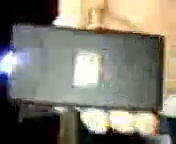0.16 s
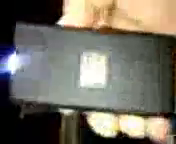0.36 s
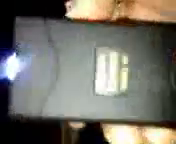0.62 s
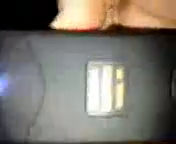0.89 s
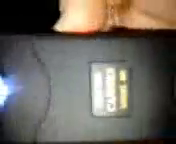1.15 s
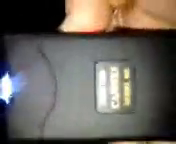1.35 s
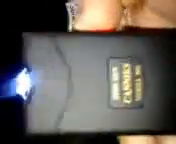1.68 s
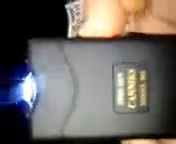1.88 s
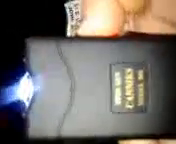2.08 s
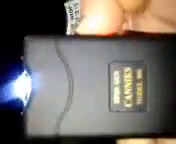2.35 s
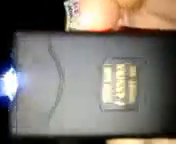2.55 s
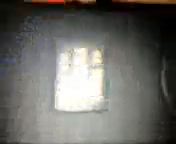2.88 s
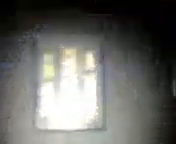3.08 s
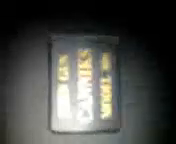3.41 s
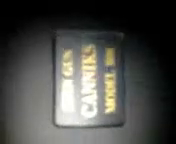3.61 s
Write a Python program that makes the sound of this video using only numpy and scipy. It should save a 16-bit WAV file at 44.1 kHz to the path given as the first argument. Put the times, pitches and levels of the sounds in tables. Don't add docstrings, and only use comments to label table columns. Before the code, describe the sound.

Brief faint room noise and a plastic click, then a stun gun's harsh electric rattle runs to the end, each snap with a low thump and short echo, close to a distorting, narrow-band microphone in a small indoor space.

```python
import sys
import numpy as np
from scipy import signal
from scipy.io import wavfile
from scipy.ndimage import uniform_filter1d

SR = 44100
rng = np.random.default_rng(int(sys.argv[2]) if len(sys.argv) > 2 else 0)


def bounce(signal):
    frames = np.transpose(np.atleast_2d(signal))
    limited = np.clip(frames, -1, 1)
    pcm = np.round(limited * 32767).astype(np.int16)
    wavfile.write(sys.argv[1], SR, pcm)


def ratio(d):
    e = np.asarray(d, float) / 20
    return 10 ** e


N = 164493

# start in seconds, strength in dB,
# thump in dB, echo fade in dB per 42 ms.
SPARK_ROWS = [(0.097, -17, -25, 2.5), (0.14, -4.5, -24.5, 8), (0.186, -13, -16, 6.5),
              (0.232, -2, -17, 10.5), (0.279, -5.5, -17, 7.5), (0.325, -5.5, -22.5, 2.5),
              (0.376, 2, -22, 4.5), (0.413, -6.5, -15, 14), (0.446, -6.5, -22.5, 6),
              (0.478, 0.5, -20, 7.5), (0.525, -3, -22.5, 8.5), (0.564, -7, -20.5, 1.5),
              (0.611, -3.5, -38, 2.5), (0.681, -19, -43, -12), (0.752, -11, -25, 2), (0.788, -7, -40, 4),
              (0.833, -0.5, -20.5, 6), (0.875, -5.5, -27, 8), (0.927, -5, -19, 11.5), (0.971, -6, -22, 7),
              (1.019, 1, -23, 13.5), (1.057, -18.5, -15.5, 0.5), (1.105, -4, -24, 7),
              (1.173, 3.5, -24.5, 6.5), (1.217, -5, -24, 5), (1.252, -1.5, -21, 10.5),
              (1.294, -5.5, -24.5, 2.5), (1.347, -1.5, -24.5, 5.4), (1.39, 6, -23.5, 17),
                 (1.429, -4.5, -23, 7.6), (1.479, -8.5, -46, 4.6), (1.515, -6.5, -21, 16),
                 (1.553, -8, -47, 5.1), (1.6, -6, -36, 6.9), (1.636, -3.5, -18, 10.5),
                 (1.673, 0, -20.5, 17.5), (1.709, -11, -39, 4.1), (1.757, -0.5, -37, 3.3),
                 (1.802, -4.5, -33, 3.2), (1.837, -0.5, -25, 6.9), (1.886, 1, -39, 6.5),
                 (1.926, -0.5, -39, 2), (1.973, -8, -31, 2.1), (2.014, 3, -34.5, 9.3),
                 (2.058, 2.5, -23.5, 3.5), (2.096, -0.5, -28, 3), (2.125, -14, -13, 16),
                 (2.168, -3.5, -17, 9.1), (2.206, -2.5, -36, 3.6), (2.252, -2.5, -20, 2),
                 (2.294, -2.5, -33, 5.9), (2.34, -3.5, -30, 1.7), (2.381, -2.5, -25, 6.7),
                 (2.417, -6, -18, 7.9), (2.464, -1.5, -25, 7.8), (2.509, 0, -48, 3.7),
              (2.554, 3, -33, 7.7), (2.593, -6.5, -36, 3.2), (2.63, -12, -22.5, 6.1),
               (2.68, -6.5, -34, 3.4), (2.729, -5, -30, 1.8), (2.773, -0.5, -20.5, 7),
               (2.82, -10.5, -22.5, 2.2), (2.86, -9, -35, 1.7), (2.889, -10, -26, 11.3),
               (2.94, -5.5, -15, 4.2), (3.028, -9.5, -24, 12), (3.066, -22.5, -19, 5.9),
               (3.099, -10, -20, 15), (3.145, -3.5, -26, 13.4), (3.19, -1.5, -40, 14),
               (3.229, -11.5, -42, 4.5), (3.269, 2.5, -19, 16), (3.308, -2, -18.5, 5.6),
               (3.354, -4.5, -24, 1.7), (3.426, 1, -20, 8.1), (3.46, -6.5, -20.5, 1.8),
               (3.513, 1.5, -17.5, 8.9), (3.552, -3.5, -20.5, 2.8), (3.585, -6.5, -24, 5.8),
               (3.63, -5.5, -28, 2.7), (3.679, 2, -30, 8.3),
              (0.65, -9.5, -17, 3.3),
    (0.709, -17.5, -14, 17),
    (1.127, -1.5, -18, 12.3),
    (2.982, -14.5, -14.5, 20.4),
    (3.387, -4, -32, 6.3),
    (3.718, 9, -36.5, 5.2),
]
SPARKS = np.array(sorted(SPARK_ROWS))
SPARKS[:, 0] += .0015

# frequency in Hz, level in dB per Hz.
CRACK = [(35, -56.5), (60, -13), (259, -5), (480, -3), (664, -2), (871, -2), (2870, -2), (3380, -6),
         (4510, -38.5), (5860, -71), (9920, -120)]


def strikes():
    # time in seconds, peak in dB.
    crack_rows = [(0.099, -2), (0.14, -5.5), (0.183, -8), (0.232, -6), (0.277, -5.5), (0.325, -2), (0.377, 1),
                  (0.413, -5), (0.446, -3.5), (0.481, -1), (0.524, -7.5), (0.564, -2), (0.611, -4), (0.65, -9),
                  (0.682, 1), (0.709, -7), (0.753, -4.5), (0.788, -1.5), (0.835, -1), (0.874, 0), (0.927, -5),
                  (0.973, -12), (1.02, -1), (1.057, -2), (1.103, -7), (1.126, -7), (1.173, -6), (1.216, -7),
                  (1.253, -0.5), (1.295, -5.5), (1.345, -5), (1.391, -4), (1.431, -6.5), (1.48, -1.5),
                  (1.511, -5), (1.556, -3.5), (1.601, -0.5), (1.636, -2), (1.671, -3), (1.71, -5), (1.758, -1.5),
                  (1.8, -3.5), (1.835, -0.5), (1.885, -1.5),
                  (1.928, -1), (1.973, -4.5), (2.014, -2), (2.058, 1.5), (2.097, -7.5), (2.124, 0), (2.167, -6.5),
            (2.207, -4.5), (2.251, -4), (2.295, -3), (2.341, -5), (2.381, -6.5), (2.418, -3), (2.464, -4.5),
            (2.509, -5), (2.556, -2), (2.593, -3.5), (2.63, -5), (2.678, -6.5), (2.727, -5), (2.771, -2),
            (2.821, -2.5), (2.858, -7.5), (2.89, -1), (2.939, -3.5), (2.984, -10), (3.03, -5.5),
            (3.069, -4), (3.099, -3.5), (3.145, -0.5), (3.188, -3), (3.229, -7), (3.269, -3.5),
            (3.308, -7.5), (3.355, -5), (3.388, -5.5), (3.425, -3), (3.461, -7), (3.514, 0), (3.551, 0),
            (3.584, -2), (3.632, -5), (3.683, -5), (3.719, -8.5)]
    lag_s, fade_s, loudest_db = .001, .0015, -2
    cracks = np.array(crack_rows)
    age = np.arange(1024) / SR
    fuzz = .33 * np.exp(-age / fade_s) * rng.standard_normal((len(cracks), len(age)))
    click = age == 0
    rebound_at = (.0016 * SR * rng.uniform(0.46, 0.92, len(cracks))).astype(int)
    rebound = -.8 * (np.arange(len(age)) == rebound_at[:, None])
    bursts = fuzz + click + rebound
    bursts = coloured(bursts.ravel(), CRACK, tilt_db=0.8).reshape(bursts.shape)
    out = np.zeros(N + len(age))
    for (start, peak_db), burst in zip(cracks, bursts):
        first = round((start + lag_s) * SR)
        gain = ratio(min(peak_db, loudest_db) - 1.2)
        out[first:first + len(age)] += gain * burst / abs(burst).max()
    return out[:N]


def echoes():
    # time in seconds, level of the upper band in dB.
    aim = [(.1, 3.5), (.4, 0.5), (.7, 2.5), (1.01, 2.2), (1.3, -2.2), (1.6, 1), (1.9, 0), (2.2, -0.2),
           (2.5, 0.5), (2.8, 2.5), (3.1, 1.5), (3.4, 1), (3.7, 0.5)]
    # time in seconds, level in dB.
    nearness = [(.1, 3.5), (.4, 2), (.7, -2.5), (1.0, 0), (1.3, -3), (1.6, -3.5), (1.9, 0.5), (2.2, 1.5),
                (2.5, -1.5), (2.8, -3), (3.05, 6.5), (3.3, 3.5), (3.6, 0.5)]
    t = np.arange(N) / SR
    latest = np.maximum(np.searchsorted(SPARKS[:, 0], t) - 1, 0)
    start, snap_db, _, fade_db = SPARKS[latest].T
    age = np.maximum(t - start, 0)
    until_next = np.maximum(np.append(SPARKS[1:, 0], 9)[latest] - t, 0)

    rise_s = .004
    wall_db = 3 * np.exp(-((age - .015) / .0025) ** 2)
    hush_db = -1.5 * np.exp(-until_next / .005)
    echo_db = -17 + 0.39 * snap_db - fade_db * age / 0.042 + wall_db + hush_db
    noise = echo_noise()
    raw = (1 - np.exp(-age / rise_s)) * ratio(echo_db) * noise

    split_hz, clump_db, clump_s, tied = 2300, 1.8, .0025, .4
    clumps = drifting(clump_s)
    low = signal.sosfiltfilt(signal.butter(3, split_hz, fs=SR, output="sos"), raw)
    treble_lingers_db = 0.35 * fade_db * age / 0.034
    upper_db = np.interp(t, *np.transpose(aim)) + treble_lingers_db + clump_db * clumps
    lower_db = clump_db * (tied * clumps + np.sqrt(1 - tied ** 2) * clumps[::-1])
    out = wander(low * ratio(lower_db) + (raw - low) * ratio(upper_db))

    near_hz = 600
    deep = signal.sosfiltfilt(signal.butter(2, near_hz, fs=SR, output="sos"), out)
    near_gain = ratio(np.interp(t, *np.transpose(nearness)))
    out = out + (near_gain - 1) * deep
    return ringing(coloured(out, CRACK))


def echo_noise():
    grains_per_s, grain_db, grain_share = 1500, 2.6, .45
    noise = rng.standard_normal(N)
    grains = ratio(grain_db * np.minimum(rng.exponential(1, N), 5))
    grains = grains * (rng.random(N) < grains_per_s / SR)
    grains = evened(grains * np.sign(noise))
    return np.sqrt(grain_share) * grains + np.sqrt(1 - grain_share) * noise


def wander(x):
    centre_hz, spread, width_hz, gain_db = 2700, .15, 400, -7
    drift = np.clip(drifting(.015), -1.6, 1.6)
    hz = centre_hz * np.exp(spread * drift)
    turn = np.exp(2j * np.pi * np.cumsum(hz) / SR)
    r = np.exp(-np.pi * width_hz / SR)
    band = turn * signal.lfilter([1 - r], [1, -r], x / turn)
    return x + ratio(gain_db) * 2 * band.real


def ringing(x):
    # frequency in Hz, level in dB.
    tones = [(1145, -8), (1322, -4), (1765, -3), (2209, -4.5), (2329, -1), (2788, -13), (2966, -1.5),
             (3258, -1)]
    width_hz = 22
    return x + sum(ratio(db) * signal.lfilter(*signal.iirpeak(hz, hz / width_hz, SR), x) for hz, db in tones)


def thumps():
    lag_s, pitch_hz, pitch_spread = .002, 108.5, .28
    rise_s, fade_s, sweep, sweep_s = .0011, .0085, 1.61, .0029
    kicks = np.zeros(N)
    kicks[((SPARKS[:, 0] + lag_s) * SR).astype(int)] = ratio(SPARKS[:, 2] + 6)
    age = np.arange(0, .06, 1 / SR)
    shape = np.exp(-age / fade_s) * np.minimum(age / rise_s, 1)
    sag = age + sweep * sweep_s * (1 - np.exp(-age / sweep_s))
    kind = rng.integers(-1, 2, N) * (kicks < ratio(-12))
    out = np.zeros(N)
    for step in (-1, 0, 1):
        hz = pitch_hz * np.exp(pitch_spread * step)
        thump = shape * np.sin(2 * np.pi * hz * sag - 1.1)
        out += signal.oaconvolve(kicks * (kind == step), thump)[:N]
    return out


def trigger():
    # frequency in Hz, width in Hz (not used), level in dB.
    shell = [(1940, 210, -2.5), (2550, 190, -2), (3340, 190, -7.5)]
    start_s, rise_s, ring_s = .0718, .0012, .0014
    age = np.arange(N) / SR - start_s
    swell = np.clip(age / rise_s, 0, 1) * np.exp(-np.clip(age - rise_s, 0, 1) / ring_s)
    tones = sum(ratio(db) * np.cos(2 * np.pi * hz * (age - rise_s)) for hz, _, db in shell)
    return ratio(-10) * swell * tones


def room():
    # frequency in Hz, level in dB per Hz.
    colour = [(25, -30), (60, -18.5), (205, -10), (400, -28), (506, -18.5), (855, -28), (2350, -32),
              (3260, -34), (3700, -53), (4510, -95), (5860, -103), (9920, -120)]
    # frequency in Hz, width in Hz, level in dB.
    whistles = [(2320, 170, -35), (3100, 170, -43)]
    t = np.arange(N) / SR
    duck_db = np.interp(t, [.066, .08, .1, .12], [-3, -8.5, -0.5, -16.5])
    hiss, breath = rng.standard_normal((2, N))
    out = ratio(-23.5) * evened(coloured(hiss, colour))
    for hz, width_hz, db in whistles:
        out += ratio(db) * evened(signal.filtfilt(*signal.iirpeak(hz, hz / width_hz, SR), breath))
    return ratio(duck_db) * out


def overload_ticks():
    # time in seconds, level in dB.
    hard = [
        (.0002, -52),
        (.6106, -28),
        (.8765, -32),
        (1.8868, -29),
        (3.3654, -43),
        (3.515, -39),
    ]
    # time in seconds, level in dB.
    soft = [
        (.0745, -50),
        (.5965, -48),
        (.8863, -36),
        (1.872, -40),
        (3.042, -48),
        (3.086, -44),
        (3.182, -48),
    ]
    ticks = np.zeros(N)
    for start, db in hard:
        ticks[round(start * SR)] = ratio(db + 10)
    ticks = np.convolve(ticks, [.65, .35])[:N]
    for start, db in soft:
        ticks[round(start * SR):][:13] += ratio(db) * signal.windows.blackman(13)
    return ticks


def evened(x):
    return x / np.sqrt(np.mean(x ** 2) + 1e-20)


def drifting(seconds):
    width = round(seconds * SR)
    noise = rng.standard_normal(N)
    return evened(uniform_filter1d(uniform_filter1d(noise, width), width))


def read(points, hz):
    f, value = np.transpose(points)
    return np.interp(np.log(hz + 1), np.log(f + 1), value)


def coloured(x, points, tilt_db=0):
    hz = abs(np.fft.fftfreq(8192, 1 / SR))
    db = read(points, hz) + tilt_db * np.log2(np.clip(hz, 200, 4000) / 1000)
    log_gain = np.log(ratio(np.maximum(db, -100)))
    taps = np.fft.ifft(np.exp(np.conj(signal.hilbert(log_gain)))).real[:4096]
    return signal.oaconvolve(x, taps / np.linalg.norm(taps))[:len(x)]


def scene():
    return (strikes() + echoes() + thumps() + trigger() + room())[None]


def band_limit(x):
    return signal.sosfilt(signal.butter(12, 15830, fs=SR, output="sos"), x)


def record(dry):
    knee, ceiling = .5, .68
    span = ceiling - knee
    over = np.maximum(abs(dry) - knee, 0)
    squashed = np.clip(dry, -knee, knee) + np.sign(dry) * span * np.tanh(over / span)
    bass_cut = signal.butter(2, 60, "highpass", fs=SR, output="sos")
    voice_edge_hz = 4470
    taps = signal.firwin(401, voice_edge_hz, window=("kaiser", 10), fs=SR)
    narrow = signal.oaconvolve(signal.sosfilt(bass_cut, squashed), taps[None], "same")
    left_s = (N - np.arange(N)) / SR
    ending = np.sin(np.minimum(left_s / .003, 1) * np.pi / 2) ** 2
    return band_limit((narrow + overload_ticks()) * ending)


dry = scene()
out = record(dry)
bounce(out)
```